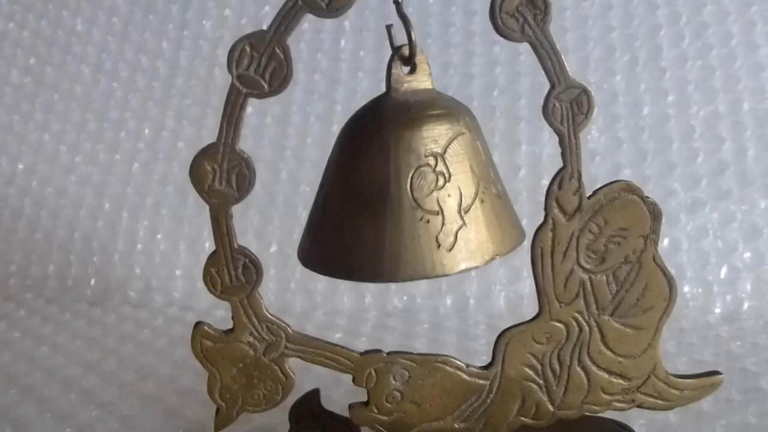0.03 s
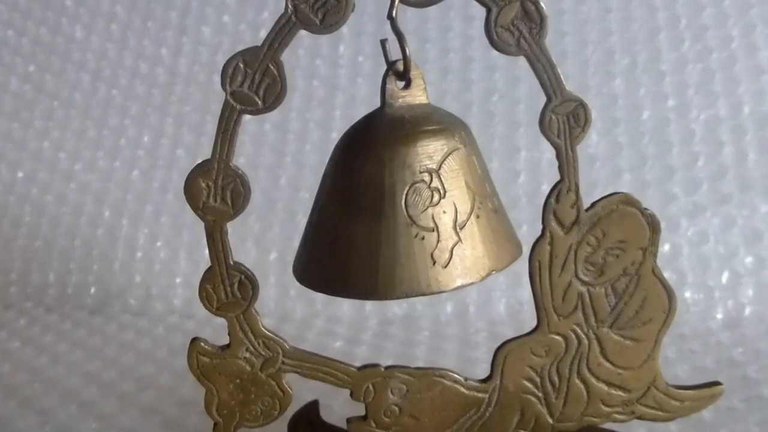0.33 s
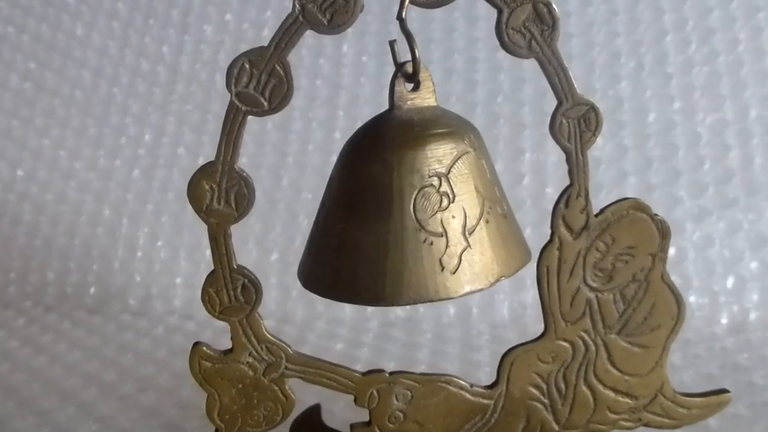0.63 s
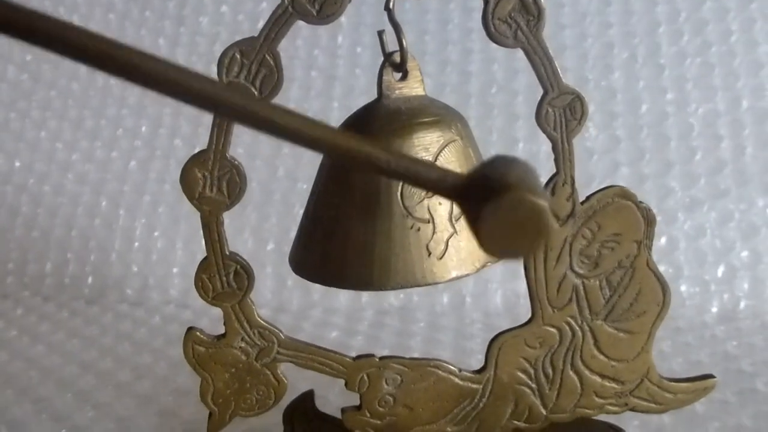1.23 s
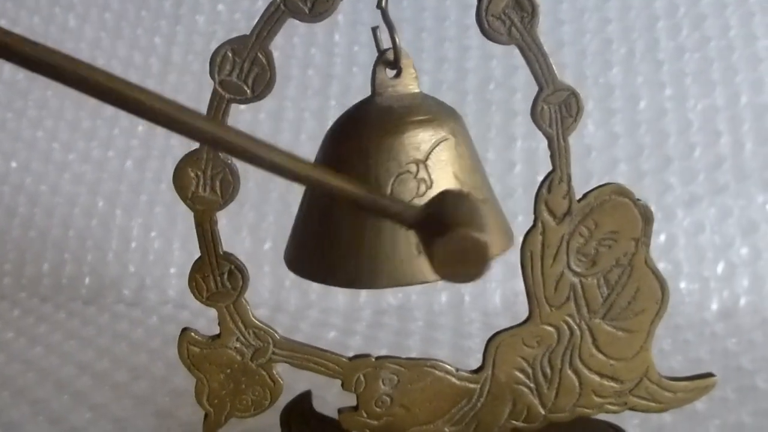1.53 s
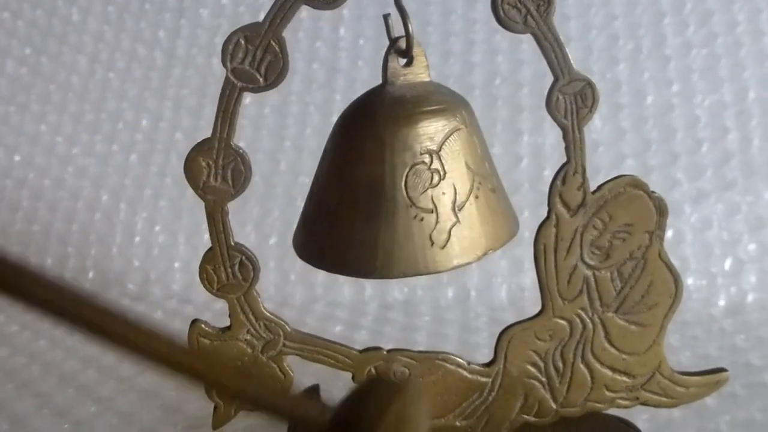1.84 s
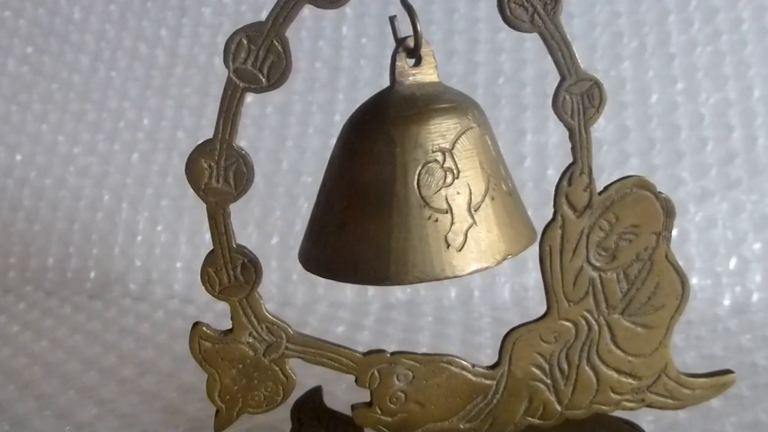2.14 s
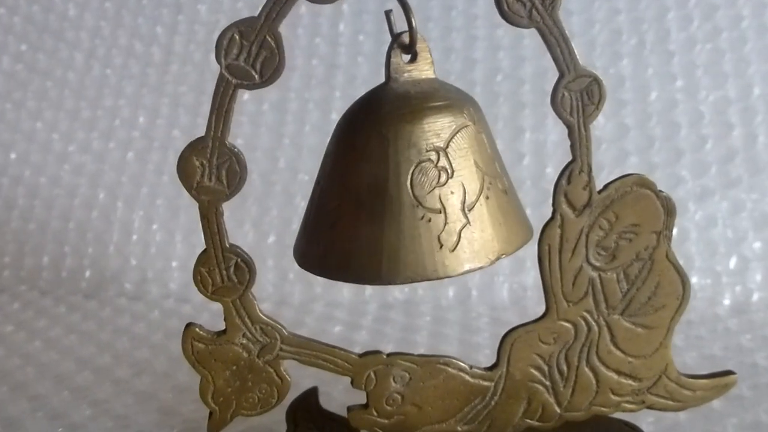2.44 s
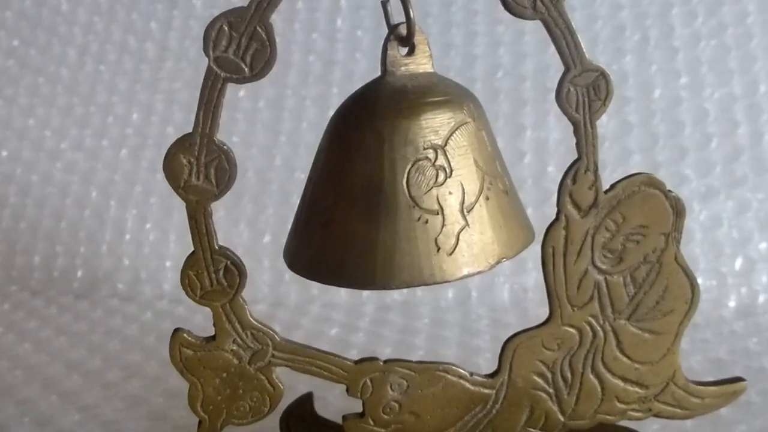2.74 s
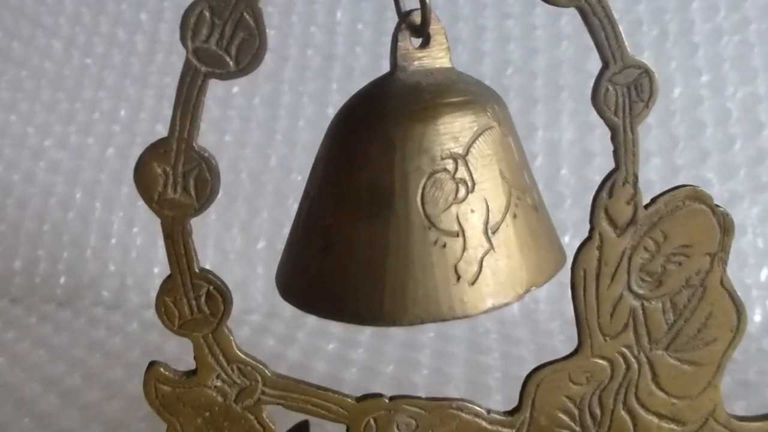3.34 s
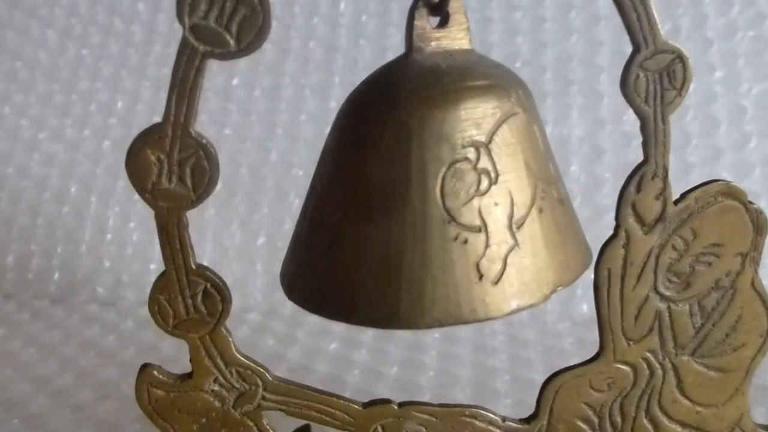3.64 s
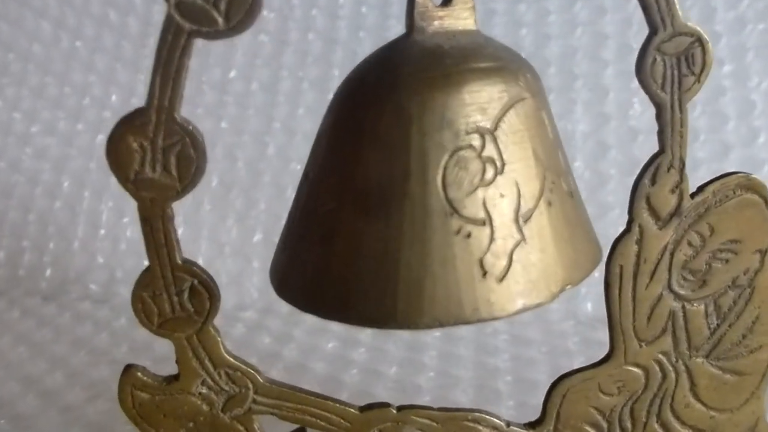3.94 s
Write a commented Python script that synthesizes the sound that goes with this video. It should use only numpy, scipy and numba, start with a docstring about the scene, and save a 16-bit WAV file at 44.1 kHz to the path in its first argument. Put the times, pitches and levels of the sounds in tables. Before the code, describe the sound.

A small brass bell is struck once, close by, with a mallet at about 1.4 seconds: a sharp knock with two tiny bounces. The high, fluttering ring holds briefly, then fades slowly until the end, around 4 seconds. Its hook ticks lightly a few times between 2.5 and 3.2 seconds. Throughout, the quiet room carries soft hiss, a low electrical hum and a very faint, distant ticking clock.

```python
"""First you hear a quiet room: soft hiss, mains hum and a distant ticking clock. Then a mallet strikes
a small brass bell once, close by. The bell rings with three pairs of tones; the two tones of a pair are
so close that they beat (flutter). They fade while the bell rocks on its hook, which ticks a few times.
A limiter turns the sound down at the blow and slowly back up, so the ring swells before it dies."""
import sys
import numpy as np
from scipy import signal
from scipy.fft import rfft, irfft
from scipy.io import wavfile
from scipy.ndimage import uniform_filter1d
from numba import njit

SR = 44100
rng = np.random.default_rng(int(sys.argv[2]) if len(sys.argv) > 2 else 0)


def wav_record(signal):
    """Record a signal, one row per channel, as 16-bit PCM in the file named by sys.argv[1]."""
    frames = np.transpose(np.atleast_2d(signal))
    bounded = np.clip(frames, -1, 1)
    # unit amplitude maps onto the largest positive 16-bit level
    quanta = np.round(bounded * 32767).astype(np.int16)
    wavfile.write(sys.argv[1], SR, quanta)


N = 176400
STRIKE_S = 1.3874

# The bell's tones, pair by pair:
# f/Hz, level/dB, time to fade 60 dB/s, rocking depth/dB, dip behind the mallet/dB, left ear's lead/rad
BELL_TONES = [ (2836.8, -9.8, 3.6, -1.3, -1, -.25), (2865.8, -4.6, 6.25, 1.4, -2, -.5),
              (7237.6, 0, 1.48, .3, -9, .4), (7371.6, -5.3, 1.33, -.3, -8, -.5),
              (13390.2, -8.5, .43, 0, -6, 1.2), (13472.4, -8.5, .49, 0, -7, -.8)]
# Pan (left level minus right) as the bell turns: t/s, low pair's pan/dB, upper pairs' pan/dB
BELL_TURN = [(1.4, -1.5, -13.5), (1.46, 0.5, -0.5), (1.54, 1, -7.5), (1.99, -1.0, 5), (2.5, -1, -1),
             (2.66, -1.5, -3.5), (2.86, -2.0, 0.5), (3.22, -3.5, 1), (3.25, -3.0, 1), (4.0, -5.5, 4)]
# The blow and two light bounces: t/s after the strike, level/dB, pan/dB
MALLET_KNOCKS = [(0, 6, 11), (0.0297, -8, -1), (0.0564, -12, 2)]
# Tone colour of a knock: f/Hz, level/dB
MALLET_SPECTRUM = [(40, -40), (150, -22), (400, -23), (1500, -19), (2200, -20), (3000, -8.5), (4200, -1.5),
                   (5000, -6), (6200, -2), (7300, 6.5), (9000, -6), (12000, -8), (13500, 0), (15500, -26.5)]
# Ticks of the hook: t/s, level/dB, ring f/Hz, ring boost/dB, pan/dB
HOOK_TICKS = [(0.103, -48, 4400, 15, .5), (2.467, -33.5, 4400, 21.5, 4.5), (2.737, -42, 1750, 12.5, -1.5),
              (2.811, -35.5, 4500, 11, -0.5), (3.043, -35.5, 3700, 10.5, 0), (3.2074, -31, 3400, 13.5, 5)]
# Tone colour of a hook tick: f/Hz, level/dB
HOOK_SPECTRUM = [(200, -19.5), (1000, -14), (2500, 3.5), (5000, -7), (7000, -0.5), (10000, -7),
                 (15000, -16.5)]
# The clock's two beats: first t/s, level/dB, rise/s, decay/s
TICK_BEAT = (.168, -51, .012, .022)
TOCK_BEAT = (.425, -53, .014, .026)
# The pitches each beat rings at: f/Hz, width/Hz, level/dB
TICK_RINGS = [(2240, 700, -14), (5450, 30, -3), (6590, 55, 0), (6750, 400, -9), (7860, 80, -15)]
TOCK_RINGS = [(2080, 260, -1), (2260, 130, 0), (3610, 200, -10), (6600, 250, -11), (8400, 60, -12)]
# Tones of the mains hum: f/Hz, level/dB
HUM_TONES = [(59.8, -78), (119.9, -53.5), (359.8, -71.5), (719.6, -76)]
# Tone colour of the room's air, the deep bass and the rest: f/Hz, level/dB
AIR_LOWS = [(20, -30), (45, -16), (85, -2.5)]
AIR_SPECTRUM = [(94, -32), (160, -1), (301, -2.5), (467, -9.5), (740, -7), (1130, -14.5), (1680, -16.5),
                (10600, -21.5), (14100, -25.5), (15500, -35)]
# How wide the air sounds: f/Hz, level/dB of the ears' difference over what they share
AIR_SPREAD = [(60, -3.5), (200, -7), (380, 1), (700, 2), (1300, 7.5), (2400, 6), (4400, 2.5), (8000, -0.5),
              (15000, -5)]


def bell(rock_hz=6.85, rock_peak_s=1.416, rock_fade_s=2.2, build_s=.0006):
    """Paired tones beat; rocking varies their levels, and turning moves them between the ears."""
    t = np.arange(N) / SR
    age = np.maximum(t - STRIKE_S, 0)
    rock = np.cos(2 * np.pi * rock_hz * (t - rock_peak_s)) * np.exp(-age / rock_fade_s)
    shade = np.exp(-((t - 1.511) / .081) ** 2)  # the mallet passes in front of the bell
    when, low, upper = np.transpose(BELL_TURN)
    pans = [np.interp(t, when, pan) for pan in (low, upper, upper + 8.5)]  # the top pair leans left
    out = np.zeros((2, N))
    for k, (hz, db, fade_s, rock_db, shade_db, lead) in enumerate(BELL_TONES):
        level = amp(db + rock_db * rock + shade_db * shade)
        fade = np.exp(-np.log(1000) * age / fade_s)
        phase = 2 * np.pi * hz * age + np.array([[lead], [-lead]]) / 2
        out += level * fade * panned(pans[k // 2]) * np.sin(phase)
    return out * (1 - np.exp(-age / build_s))  # the ring builds while the mallet touches


def mallet():
    """The mallet knocks on the brass and bounces twice."""
    out = np.zeros((2, N))
    for delay, db, pan_db in MALLET_KNOCKS:
        knock = click(MALLET_SPECTRUM, decay_s=.0012, tail_db=-32.5, tail_s=.021)
        add(out, STRIKE_S + delay, amp(db) * panned(pan_db) * knock)
    return out


def hook():
    """The hook ticks as it slips in the loop the bell hangs from."""
    out = np.zeros((2, N))
    for s, db, hz, boost_db, pan_db in HOOK_TICKS:
        tick = click(HOOK_SPECTRUM, decay_s=.0013, tail_db=-20.5, tail_s=.022,
                     ring_hz=hz, ring_db=boost_db)
        add(out, s, amp(db) * panned(pan_db) * tick)
    return out


def clock(period_s=.533):
    """A distant clock: tick and tock take turns, each a few ringing pitches blurred by the room."""
    out = np.zeros((2, N))
    for (first, db, rise_s, decay_s), rings in ((TICK_BEAT, TICK_RINGS), (TOCK_BEAT, TOCK_RINGS)):
        def shape(hz):
            powers = [amp(level) ** 2 / (1 + (2 * (hz - f) / width) ** 2) for f, width, level in rings]
            return np.sqrt(sum(powers))
        for s in np.arange(first, N / SR, period_s):
            t, ring = noise(shape)
            envelope = np.minimum(t / rise_s, np.exp(-(t - rise_s) / decay_s))
            add(out, s, amp(db) * ring * envelope)
    return out


def mains_hum():
    """Mains electricity hums with a few steady low tones."""
    t = np.arange(N) / SR
    tones = [amp(db) * np.sqrt(2) * np.sin(2 * np.pi * (hz * t + rng.random())) for hz, db in HUM_TONES]
    return panned(pan_db=-1.5) * sum(tones)


def room_air(level_db=-51, patch_db=.73):
    """Room air and microphone hiss: soft noise, slightly patchy over time and pitch."""
    frames, hz = N // 256 + 5, np.fft.rfftfreq(1024, 1 / SR)
    mid_re, mid_im, side_re, side_im, patches = rng.standard_normal((frames, len(hz), 5)).T
    patches = uniform_filter1d(patches, size=10, axis=0)  # smooth over pitch
    patches = unit_level(uniform_filter1d(patches, size=14, axis=1))  # then over time
    mid = mid_re + 1j * mid_im  # what both ears share
    side = amp(level_at(AIR_SPREAD, hz))[:, None] * (side_re + 1j * side_im)
    colour_db = level_at(AIR_LOWS + AIR_SPECTRUM, hz)[:, None]
    spectra = np.array([mid + side, mid - side]) * amp(colour_db + patch_db * patches)
    _, air = signal.istft(spectra, nperseg=1024, noverlap=768)
    return amp(level_db) * unit_level(air[:, :N])


def click(colour, decay_s, tail_db, tail_s, ring_hz=1000, ring_db=0):
    """A brief contact: a burst of noise, alike in both ears, with a faint tail from the room."""
    def shape(hz):
        ring = np.exp(-(np.log2((hz + 1) / ring_hz) / .5) ** 2)  # half an octave to each side
        return amp(level_at(colour, hz) + ring_db * ring)
    t, direct = noise(shape)
    t, room = noise(shape)
    return direct[0] * np.exp(-t / decay_s) + amp(tail_db) * room * np.exp(-t / tail_s)


def noise(gain_at, size=8192):
    """Sample times and two unrelated channels of noise with the given tone colour."""
    spectrum = rfft(rng.standard_normal((2, size))) * gain_at(np.fft.rfftfreq(size, 1 / SR))
    return np.arange(size) / SR, unit_level(irfft(spectrum))


def amp(db):
    """Turns decibels into a gain to multiply by."""
    return 10 ** (np.asarray(db) / 20)


def unit_level(x):
    """Scales a signal to an average (rms) level of 1."""
    return x / np.sqrt(np.mean(x ** 2) + 1e-20)


def level_at(points, hz):
    """Looks up a level between a table's points, on a pitch (log-frequency) scale."""
    f, db = np.transpose(points)
    return np.interp(np.log(hz + 1), np.log(f + 1), db)


def panned(pan_db):
    """Left and right gains; a positive pan leans left."""
    half = np.atleast_1d(pan_db) / 2
    return amp(np.array([half, -half]))


def add(mix, s, sound):
    """Mixes a sound in at s seconds."""
    part = mix[:, max(round(s * SR), 0):][:, :sound.shape[1]]
    part += sound[:, :part.shape[1]]


def scene():
    """The struck bell and its hook in the quiet room."""
    return bell() + mallet() + hook() + clock() + room_air() + mains_hum()


@njit
def limiter_gain(peak, ceiling, attack_s, recover_s):
    """Gain that drops fast while peaks pass the ceiling, then creeps back to one."""
    fall, rise = 1 / (attack_s * SR), 1 / (recover_s * SR)
    gain, now = np.ones(len(peak)), 1.0
    for i in range(len(peak)):
        if peak[i] * now > ceiling:
            now += (ceiling / peak[i] - now) * fall
        else:
            now += (1 - now) * rise
        gain[i] = now
    return gain


def record(dry, lookahead_s=.0007, step_db=.35, clip_db=-4.5, start_s=.041, low_hz=75, high_hz=15750):
    """A limiter ducks the blow, which still overloads briefly; the deepest bass and top treble are cut."""
    t = np.arange(N) / SR
    coming_peak = np.interp(t + lookahead_s, t, abs(dry).max(0))
    gain = limiter_gain(coming_peak, ceiling=float(amp(-10)), attack_s=.00042, recover_s=1)
    stepped_db = step_db * np.round(20 * np.log10(gain) / step_db)
    gain = uniform_filter1d(amp(stepped_db), size=9)  # soften the edge of each step
    out = np.clip(dry * gain, -amp(clip_db), amp(clip_db)) * (t > start_s)
    low_cut = signal.butter(2, low_hz, "highpass", fs=SR, output="sos")
    high_cut = signal.firwin(255, high_hz, window=("kaiser", 9), fs=SR)
    return signal.oaconvolve(signal.sosfilt(low_cut, out), high_cut[None], "same")


dry = scene()
out = record(dry)
wav_record(out)
```